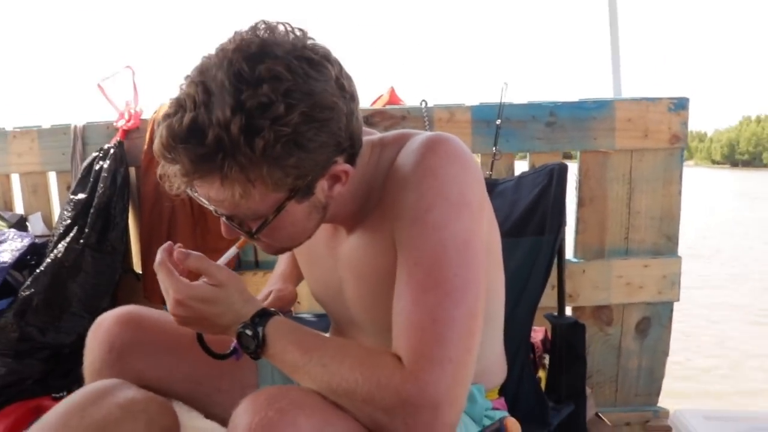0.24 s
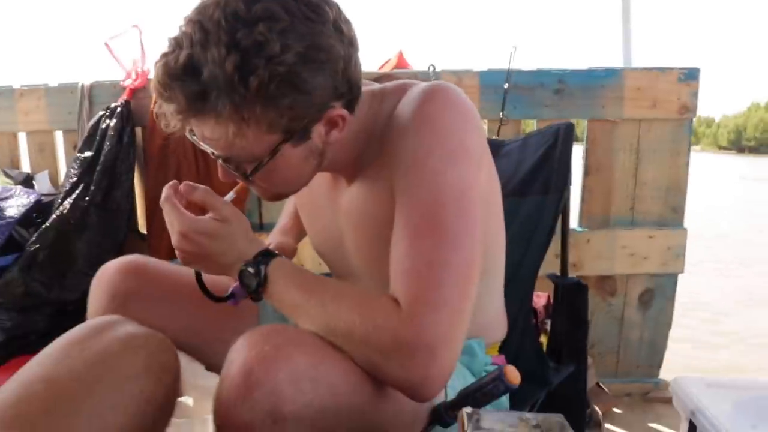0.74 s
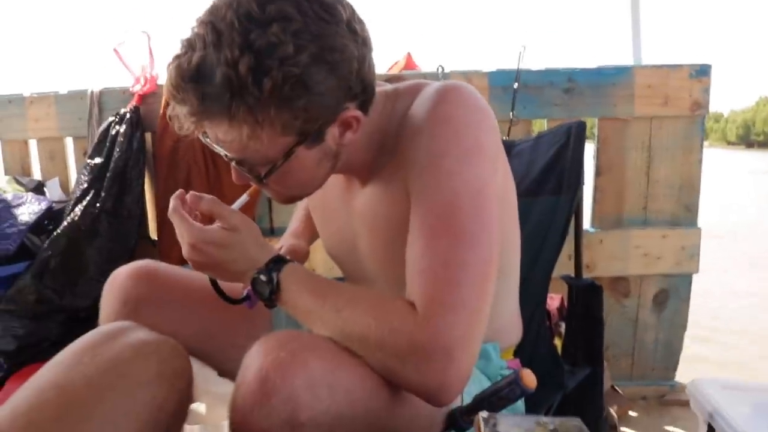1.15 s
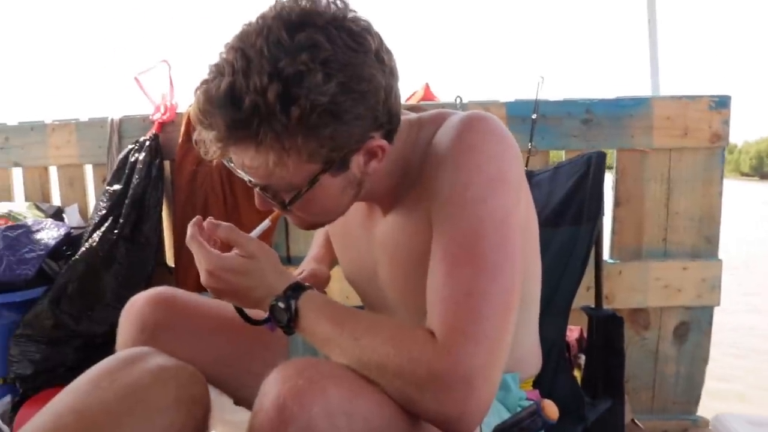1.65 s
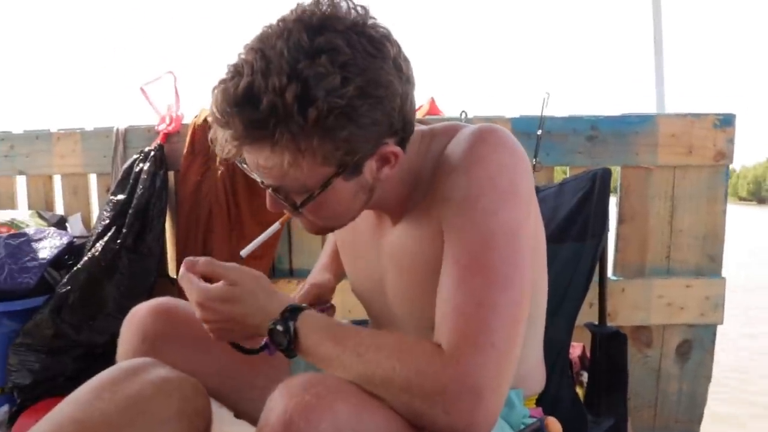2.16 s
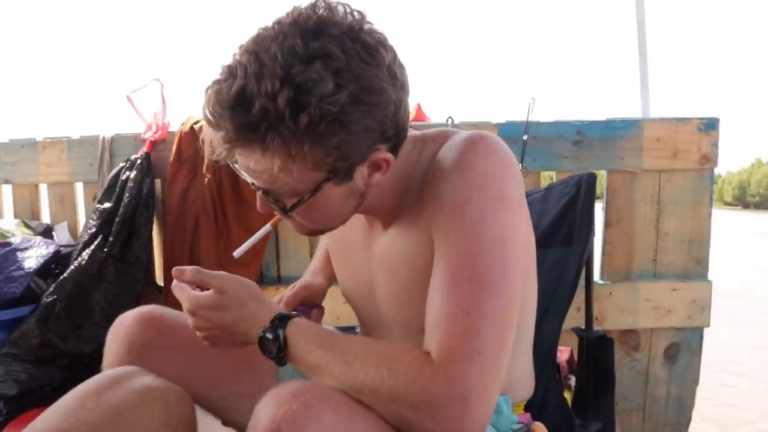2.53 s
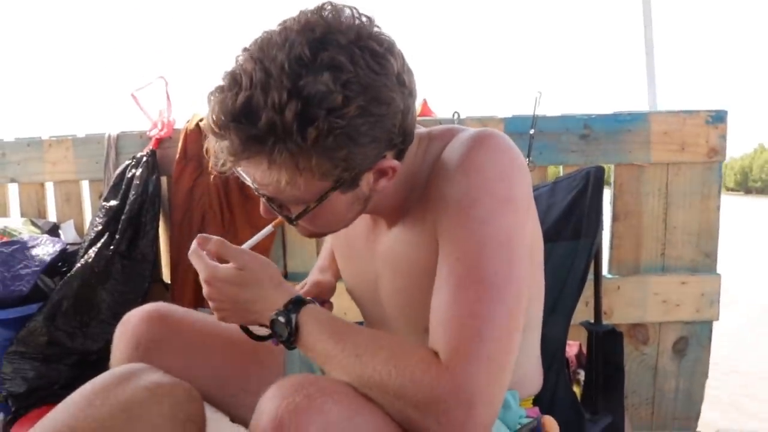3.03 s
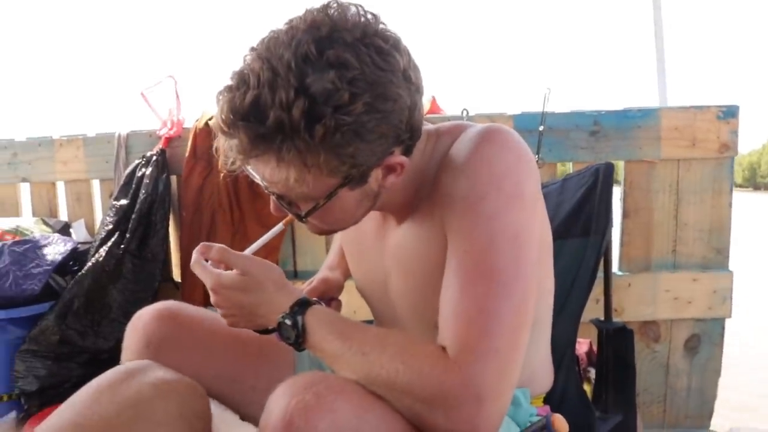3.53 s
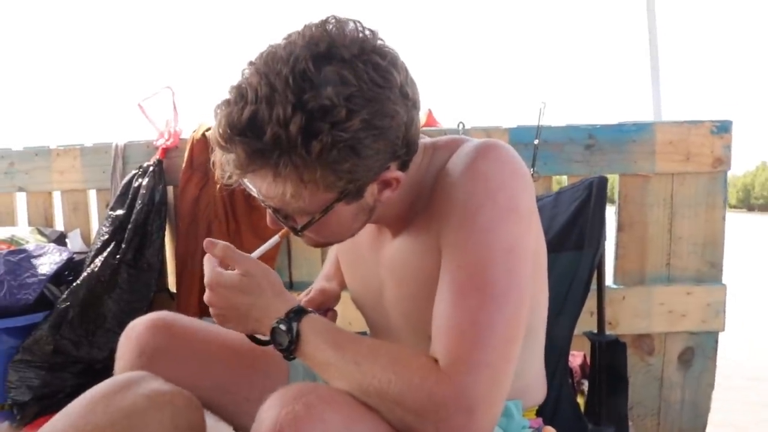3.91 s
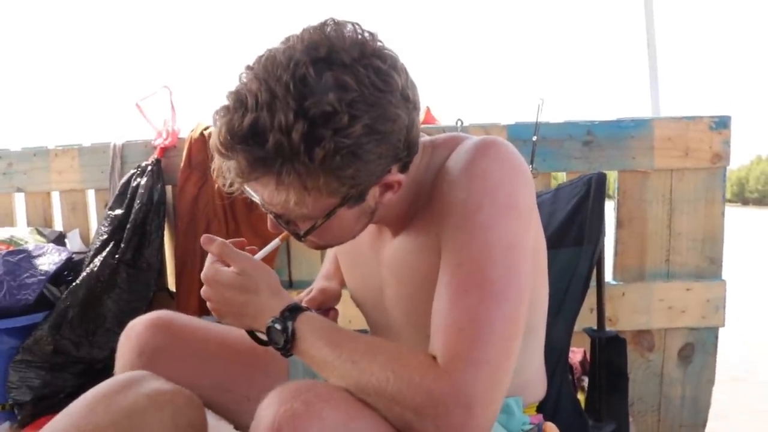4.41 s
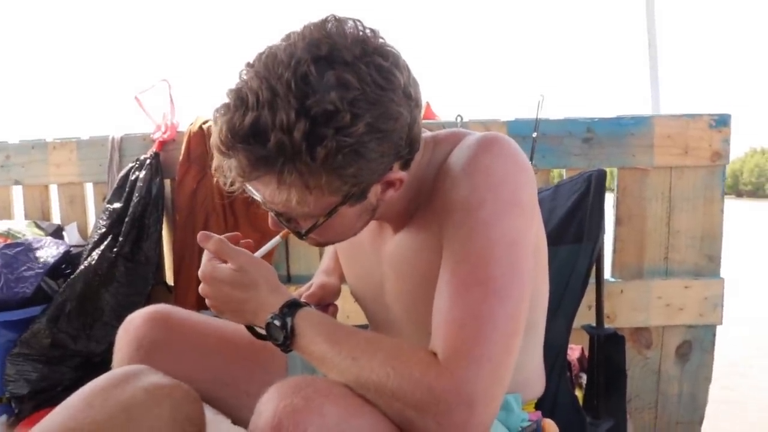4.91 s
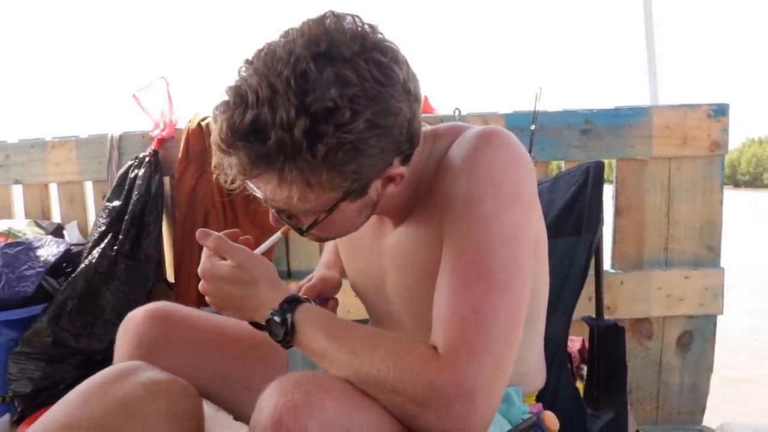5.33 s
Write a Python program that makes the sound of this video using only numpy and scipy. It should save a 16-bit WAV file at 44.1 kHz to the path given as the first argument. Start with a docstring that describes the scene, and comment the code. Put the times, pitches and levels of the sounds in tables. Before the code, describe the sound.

Close stereo pickup on the open deck of a slow boat. A low, steady motor hum near 105 Hz wavers throughout over soft water wash, with breeze rumble strongest at first and dull microphone bumps around 0.0, 0.3, 0.9, 2.7 and 3.1 s. A faint shrill insect band stays constant. From 0.9 s a lighter button scrapes down in tiny grains, then snaps hard at 1.1 s, bright and slightly clipped, with brief plastic ringing and short scattered echo. More snaps come at 1.6, 3.3, 3.7, 4.3, 4.9 and 5.3 s, each followed about 0.2 to 0.3 s later by a quieter double tick as the button returns. Soft hollow pops from cupped hands occur mainly around 1.05 and 1.4 s. Very faint distant bird whistles appear near 1.8 to 2.5 s and 4.0 s. The lighter never ignites; the sound ends just after the last return tick at 5.5 s.

```python
"""Clicking a lighter on a river boat

A piezo lighter is clicked seven times close to the microphones on the open deck of a slow boat, and never lights.
The button scrapes down in tiny grains of noise, a hard snap rings the lighter, and the button ticks back up.
Soft pops ring in the cupped hands. Under them a motor hums in wavering tones and the river washes as noise.
A breeze rumbles and bumps on the microphones; shrill noise makes the insects, gliding tones a few birds."""
import sys
import numpy as np
from scipy import signal
from scipy.fft import rfft, irfft
from scipy.io import wavfile
from scipy.ndimage import uniform_filter1d

SR = 44100
rng = np.random.default_rng(int(sys.argv[2]) if len(sys.argv) > 2 else 0)


def transcribe(signal):
    """Save signal, clipped to [-1, 1], as a 16-bit WAV file at the path in sys.argv[1]."""
    frames = np.atleast_2d(signal).T
    limited = np.clip(frames, -1, 1)
    pcm = np.round(limited * 32767).astype(np.int16)
    wavfile.write(sys.argv[1], SR, pcm)


N = 245284
TIME = np.arange(N) / SR

# Levels in the tables are relative: the functions add the overall level of each sound.
# Snaps of the hammer. Each row: start in seconds, level in dB, deck echo in dB, low knock of the case in dB.
SNAPS = [(1.1420, 2.5, 1.5, -2), (1.6322, 0.5, 4, -1.5), (3.258, -1.5, 8, -10), (3.7085, -1.5, 6.5, -3),
         (4.3462, 2, 2, -12), (4.8556, -2, 8, -18), (5.3148, 0.5, 4, -4)]
# Resonances of the lighter in the cupped hands. Each row: pitch in Hz, width in Hz, level in dB.
LIGHTER = [(490, 92, -12.5), (1492, 162, -8), (2270, 138, -3), (3216, 134, -3), (3720, 380, -5),
           (4250, 510, -1.5), (5470, 430, -8), (5310, 170, -19), (6125, 90, -0.5), (7370, 880, 0.5),
           (7890, 690, -2), (8305, 240, -1.5), (9750, 580, -3), (10600, 570, -14), (13040, 3700, -7),
           (14450, 2030, -6)]
# The plastic case rings on after a snap. Each row: pitch in Hz, time to fade by 60 dB in seconds, level in dB.
CASE = [(435, 0.044, -34), (470, 0.061, -27), (1290, 0.13, -43), (2152, 0.069, -27), (2380, 0.1, -35.5),
        (4000, 0.085, -28), (4140, 0.079, -23), (5644, 0.052, -18), (7820, 0.068, -18), (8640, 0.07, -23.5)]
# Colour of the echoes from deck and railing. Each row: frequency in Hz, level in dB.
DECK = [(150, -0.5), (450, -21.5), (750, -16.5), (1050, -13), (1400, -7.5), (1700, -5), (2200, 0.5),
        (2750, -9.5), (3200, 4), (4300, 1), (4900, -2.5), (5700, 1.5), (7900, 4), (11000, -1),
        (15500, -2.5)]
# The thumb pushes the button down. Each row: start in seconds, length of the scrape in seconds, level in dB.
PRESSES = [(0.8814, 0.037, -31.5), (1.505, 0.051, -30), (3.07, 0.033, -31.5), (3.595, 0.087, -31.5),
           (4.259, .045, -26.5), (4.743, 0.063, -28.5), (5.2249, 0.058, -27.5)]
# The loaded spring slips under the thumb. Each row: start in seconds, peak in dB, treble in dB.
SPRING_SLIPS = [(.9246, -29, -10), (1.05, -22.5, -16.5), (1.5585, -26.5, -10), (1.602, -30, -17),
                (1.6168, -11.5, -6.5), (3.1313, -26, -18), (3.6731, -29.5, -19), (4.231, -33, -17),
                (4.8136, -29.5, -16)]
# The button springs back to its stop. Each row: time of the stop in seconds, peak in dB,
# how much earlier the hammer catches in seconds.
RELEASES = [(1.4115, -18, 0.013), (1.911, -17, .011), (3.5208, -22.5, 0.016), (4.006, -21, 0.019),
            (4.6097, -22.5, .015), (5.0902, -22.5, 0.011), (5.5312, -19.5, .006)]
# Resonances of the button. Each row: pitch in Hz, width in Hz, level in dB.
BUTTON_BODY = [(465, 72, 12.8), (1430, 156, 5.7), (2260, 690, 1.0), (3760, 1280, 0.67), (4980, 1500, 2.5)]
# Soft pops at the hands. Each row: start in seconds, pitch in Hz, level in dB.
POPS = [(0.264, 1120, -39.5), (1.05, 1430, -22.5), (1.13, 880, -33.5), (1.414, 1404, -27.5),
        (4.816, 1430, -36)]
# Strength of the motor's firing tone. Each row: time in seconds, level in dB.
MOTOR = [(0.0, -47.5), (0.17, -40.5), (1.83, -47.5), (1.87, -41), (4.03, -47), (4.49, -60), (4.89, -47),
         (5.56, -41)]
# Weaker motor lines. Each row: multiple of the pitch of the main motor tone, level in dB.
MOTOR_LINES = [(0.623, -36), (0.872, -11), (1.123, -11.5), (1.25, -11), (1.375, -23), (1.501, -20.5),
               (2, -19.5), (2.25, -22)]
# Strength of the breeze on the microphones. Each row: time in seconds, level in dB.
BREEZE = [(0, -35), (1.0, -42.5), (2.8, -47.5), (4.4, -50.5), (5.56, -46)]
# Colour of the breeze. Each row: frequency in Hz, level in dB.
BREEZE_COLOUR = [(12, -1.5), (25, -6), (40, -10), (65, -8), (110, -12.5), (200, -25.5), (400, -36),
                 (1000, -63.5)]
# Dull bumps on the microphones. Each row: start in seconds, length in seconds, frequency in Hz,
# level in dB, left minus right in dB.
BUMPS = [(.04, 0.083, 167, -42.5, 1.5), (.34, 0.089, 154, -40, 2), (.918, 0.057, 154, -30.5, 3),
         (2.675, 0.0513, 141, -37.5, -2), (3.115, 0.066, 157, -40.5, -4)]
# Colour of the motor rumble and the wash of the river. Each row: frequency in Hz, level in dB.
WASH = [(20, -2.5), (60, -0.5), (130, 1.5), (200, -4), (300, -11.5), (450, -14.5), (700, -17),
        (1000, -19.5), (1600, -25), (2700, -27.5), (4000, -30), (7000, -31.5), (12000, -34), (16000, -36)]
# Colour of the insect chorus. Each row: frequency in Hz, level in dB.
INSECTS = [(4500, -38), (6000, -14.5), (6800, -1), (7500, 3), (8400, -1), (9500, -7), (11000, -14),
           (14000, -59)]
# Whistles of far birds. Each row: start in seconds, length in seconds, first pitch in Hz,
# pitch it settles towards in Hz, level in dB.
BIRDS = [(1.78, 0.3, 2600, 2540, -66), (2.015, .09, 2720, 3030, -64), (2.115, 0.39, 5500, 4380, -63.5),
         (3.987, 0.29, 2660, 2660, -68)]

RETURN_S, SETTLE_S = 0.061, 0.0353  # the button slides this long before its stop and rattles this long after
RETURN_DB, CATCH_DB = -51.5, -24.5  # relative levels of the slide back up and of the hammer catching
SETTLE_DB, SCRAPE_DB = -32, -19  # rattle against the row level of its stop, scrape against that of its press
PRESS_TREBLE_DB, RELEASE_TREBLE_DB = -17, -10.5
MOTOR_HZ = 105.2  # average pitch of the motor
GLIDE_S = 0.055  # how quickly a whistle glides towards its last pitch
TOP_HZ = 15900  # highest frequency kept


def undb(db):
    """Turn decibels into a gain."""
    return 10 ** (np.asarray(db) / 20)


def unit(x):
    """Scale a sound to an average (rms) strength of 1."""
    return x / np.sqrt(np.mean(x ** 2))


def curve(rows):
    """Join the (time, level) rows of a table by straight lines."""
    times, levels = np.transpose(rows)
    return np.interp(TIME, times, levels)


def pan(db):
    """Left and right gains whose difference is the given number of dB."""
    return undb(np.array([[db], [-db]]) / 2)


def fade(t, t60):
    """Die away exponentially, by 60 dB in t60 seconds."""
    return np.exp(-np.log(1000) * t / t60)


def noise(size, side_db):
    """Stereo noise: a part shared by both ears plus a part that is opposite in each."""
    mid, side = rng.standard_normal((2, size))
    return unit(mid + undb(side_db) * side * np.array([[1], [-1]]))


def colour(x, points):
    """Shape the spectrum by (Hz, dB) points, then scale to rms 1."""
    hz, db = np.transpose(points)
    f = np.maximum(np.fft.rfftfreq(x.shape[-1], 1 / SR), 1)
    gain = undb(np.interp(np.log(f), np.log(hz), db))
    return unit(irfft(rfft(x) * gain, x.shape[-1]))


def resonate(x, modes):
    """Ring a set of side-by-side resonators (Hz, width Hz, dB), every second one upside down."""
    out = 0
    for k, (hz, width, db) in enumerate(modes):
        b, a = signal.iirpeak(hz, hz / width, SR)
        out = out + (-1) ** k * undb(db) * signal.lfilter(b, a, x)
    return out


def walk(rate):
    """Smooth random wandering with a spread near 1, led by `rate` random values per second."""
    k = int(SR / rate)
    steps = np.repeat(rng.standard_normal(N // k + 1), k)
    smooth = uniform_filter1d(uniform_filter1d(steps, k), k)
    return unit(smooth)[:N]


def add(out, s, x):
    """Mix a sound in at time s."""
    i = max(int(s * SR), 0)
    out[..., i:i + x.shape[-1]] += x[..., :max(N - i, 0)]


def snaps(crack_s=0.002, crack_db=-4, blow_db=11, echo_db=-14, echo_t60=0.077, ring_db=-1.0, lag_s=.000012):
    """The hammer hits the crystal and chatters for a few milliseconds; the case rings, the deck scatters."""
    out, t = np.zeros((2, N)), TIME[:SR // 6]
    contact = (1 - np.exp(-(t / .0004) ** 2)) * np.exp(-(t / crack_s) ** 4)
    blow = undb(blow_db) * (np.arange(len(t)) == int(.0006 * SR))  # a single-sample push
    echo_shape = (1 - np.exp(-t / 0.002)) * fade(t, echo_t60)
    deck = noise(len(t), 1.8)  # the same surfaces answer every snap
    for s, db, deck_db, knock_db in SNAPS:
        crack = resonate(blow + noise(len(t), -13.0) * contact, LIGHTER)
        crack *= undb(crack_db) / np.sqrt(np.mean(crack[:, :SR // 350] ** 2))  # level of its first moments
        scatter = colour(deck + noise(len(t), -6.5), DECK)
        echo = scatter * echo_shape * undb(echo_db + deck_db)
        ring = np.zeros(len(t))
        for hz, t60, mode_db in CASE:
            pitch = hz * (1 + 0.0038 * rng.standard_normal())
            gain = undb(mode_db + ring_db + knock_db * (hz < 1500))  # the knock sets only low pitches
            ring += gain * fade(t, t60) * np.sin(2 * np.pi * pitch * t)
        add(out, s, undb(db) * (crack + echo + ring))
    # the sound reaches the left microphone slightly later
    delay = np.exp(-2j * np.pi * np.fft.rfftfreq(N, 1 / SR) * lag_s)
    out[0] = irfft(rfft(out[0]) * delay, N)
    return out * pan(1.0)


def button(tick_db=-3, tick_t60=0.012, slips_per_s=240, slip_spread_db=3.5, echo_db=-26, echo_t60=0.067):
    """Plastic sticks and slips in tiny grains as the button moves, and ticks when parts catch or stop."""
    ticks, pressure, t = np.zeros((2, N)), np.zeros(N), TIME[:SR // 16]
    hits, slides = list(SPRING_SLIPS), []
    for s, length, db in PRESSES:
        hits += [(s, db, PRESS_TREBLE_DB)]
        slides += [(s, length, db + SCRAPE_DB)]
    for s, db, catch_s in RELEASES:
        hits += [(s - catch_s, CATCH_DB, RELEASE_TREBLE_DB), (s, db, RELEASE_TREBLE_DB)]
        slides += [(s - RETURN_S, RETURN_S, RETURN_DB), (s, SETTLE_S, db + SETTLE_DB)]
    for s, db, treble_db in hits:
        push = noise(len(t), -10) * fade(t, tick_t60)
        treble = [(8260, 3600, treble_db + 10.5), (13300, 3200, treble_db + 5.5)]
        tick = resonate(push, BUTTON_BODY + treble)
        add(ticks, s, undb(db + tick_db) * tick / np.abs(tick).max())
    for s, length, db in slides:
        add(pressure, s, undb(db) * signal.windows.tukey(int(length * SR), .5))
    strength_db = slip_spread_db * np.minimum(rng.exponential(size=N), 2.5)
    slips = (rng.random(N) < slips_per_s / SR) * undb(strength_db)
    grains = signal.fftconvolve(slips, fade(t, 0.0021))[:N] * noise(N, -16)
    scrape = unit(resonate(grains, BUTTON_BODY + [(10200, 3300, -5.0)]))
    direct = ticks + scrape * pressure
    scatter = noise(len(t), -6) * fade(t, echo_t60)
    echo = signal.fftconvolve(direct, scatter, axes=1)[:, :N]
    return direct + undb(echo_db) * echo


def pops(t60=0.03):
    """A soft push rings the hollow of the cupped hands in two close tones."""
    out, t = np.zeros(N), TIME[:SR // 10]
    for s, hz, db in POPS:
        ring = np.sin(2 * np.pi * hz * t) + 0.37 * np.sin(2 * np.pi * 1.18 * hz * t)
        onset = 1 - np.exp(-t / 0.0002)
        add(out, s, undb(db) * ring * fade(t, t60) * onset)
    return out


def motor(tone_db=-1.0, waver_db=1.0, lines_db=-45.5):
    """A firing tone swells and sinks, with weaker, wavering lines from uneven strokes."""
    phase = 2 * np.pi * np.cumsum(MOTOR_HZ * (1 + 0.004 * walk(3.98))) / SR
    level_db = curve(MOTOR) + tone_db + waver_db * walk(9.8)
    tone = np.sqrt(2) * np.sin(phase) * undb(level_db)
    lines = np.zeros(N)
    for multiple, db in MOTOR_LINES:
        gain = undb(db + lines_db + 3.6 * walk(5.9))
        lines += gain * np.sin(multiple * phase + rng.uniform(0, 2 * np.pi))
    return tone * pan(-0.16) + lines


def breeze(wind_db=-1, gust_db=1.5, gusts_per_s=7):
    """Eddies of air rumble on each microphone in quick gusts and now and then bump it."""
    level_db = curve(BREEZE) + wind_db + gust_db * walk(gusts_per_s)
    out = pan(2.2) * colour(noise(N, 2), BREEZE_COLOUR) * undb(level_db)
    for s, length, hz, db, side_db in BUMPS:
        size = int(length * SR)
        peak = [(hz / 4, -12), (hz / 1.01, -10), (hz, 0), (hz * 1.1, -12), (hz * 2.1, -30), (hz * 12, -65)]
        eddy = colour(noise(size, -0.97), peak)
        add(out, s, undb(db) * pan(side_db) * eddy * signal.windows.tukey(size, .5))
    return out


def river(wash_db=-45.5, swell_db=1.2, early_db=3, calm_s=0.45):
    """Motor rumble and water around the hull: coloured noise that wavers, a little louder at first."""
    swell = early_db * np.exp(-TIME / calm_s) + swell_db * walk(5.07)
    return colour(noise(N, -5.0), WASH) * undb(wash_db + swell) * pan(-0.6)


def insects(chorus_db=-52.5, waver_db=0.29):
    """Many insects on the bank blend into one shrill, nearly steady band of noise."""
    return colour(noise(N, -4.5), INSECTS) * undb(chorus_db + waver_db * walk(3.75)) * pan(-3.5)


def birds(waver=0.0081, flutter_db=2, attack_s=.025, release_s=0.13):
    """Thin, fluttering whistles from the bank glide towards a pitch, blurred by echoes from the trees."""
    out, t = np.zeros(N), TIME[:SR // 5]
    for s, length, first_hz, last_hz, db in BIRDS:
        size = int(length * SR)
        time = TIME[:size]
        glide = last_hz + (first_hz - last_hz) * np.exp(-time / GLIDE_S)
        hz = glide * (1 + waver * walk(145)[:size])
        flutter = undb(db + flutter_db * walk(37)[:size])
        edges = np.minimum(time / attack_s, 1) * np.minimum(time[::-1] / release_s, 1)
        add(out, s, flutter * edges * np.sin(2 * np.pi * np.cumsum(hz) / SR))
    trees = unit(noise(len(t), -3) * fade(t, 0.19)) / np.sqrt(len(t))
    echo = signal.fftconvolve(out[None], trees, axes=1)[:, :N]
    return (out + 0.88 * echo) * pan(-2)


def scene():
    """The lighter in front of the boat and the river."""
    lighter = snaps() + button() + pops()
    return lighter + motor() + breeze() + river() + insects() + birds()


def record(dry):
    """The microphones overload, so peaks are cut flat; a steep filter removes the top of the treble."""
    clipped = np.clip(dry, -1, 1)
    low_pass = signal.ellip(8, .1, 50, TOP_HZ, fs=SR, output="sos")
    return signal.sosfiltfilt(low_pass, clipped)


dry = scene()
out = record(dry)
transcribe(out)
```